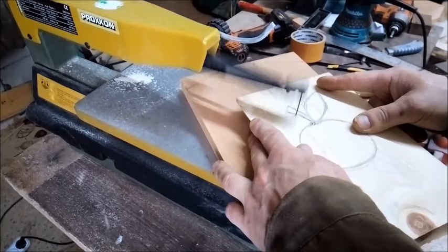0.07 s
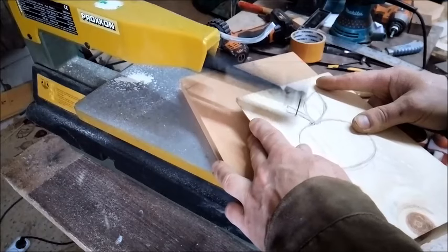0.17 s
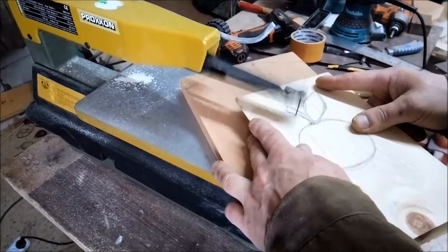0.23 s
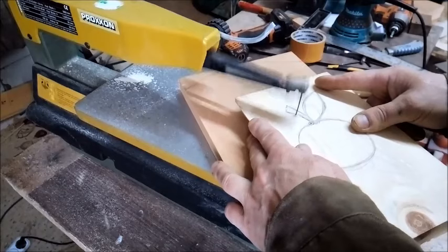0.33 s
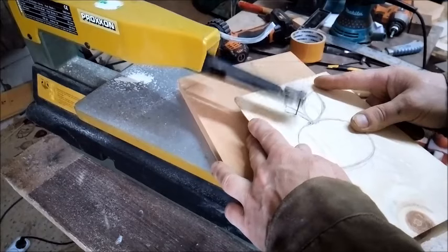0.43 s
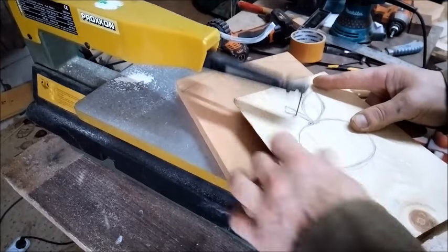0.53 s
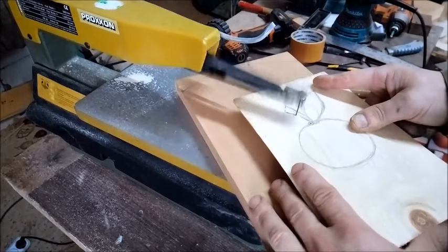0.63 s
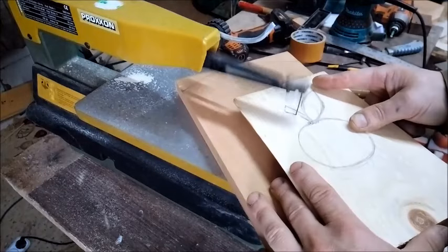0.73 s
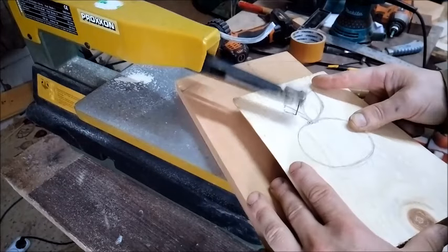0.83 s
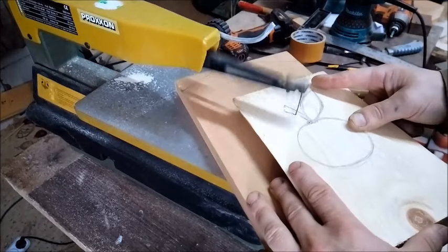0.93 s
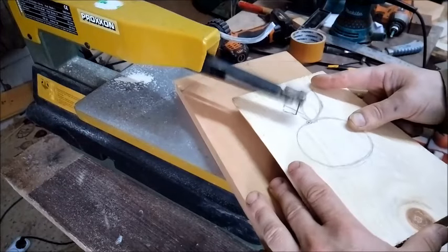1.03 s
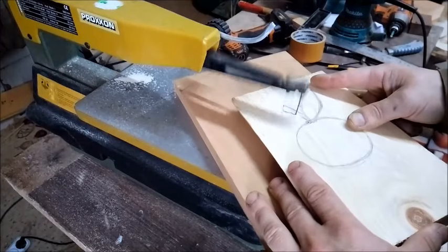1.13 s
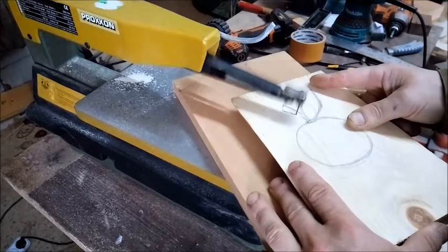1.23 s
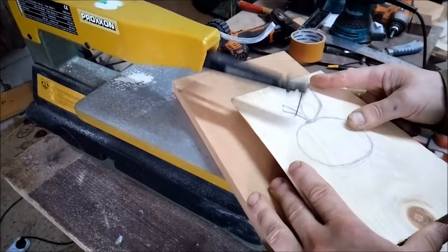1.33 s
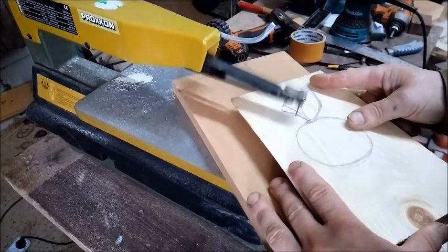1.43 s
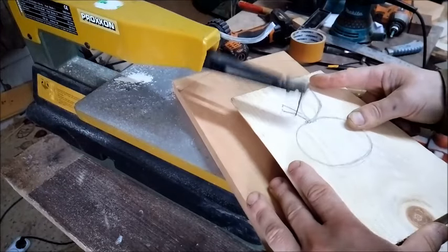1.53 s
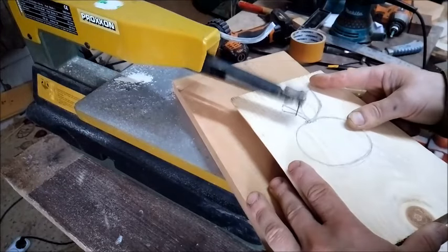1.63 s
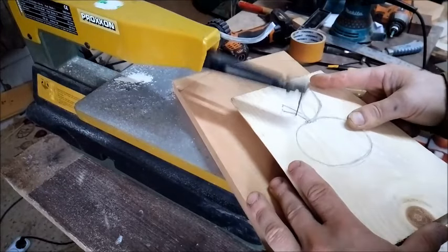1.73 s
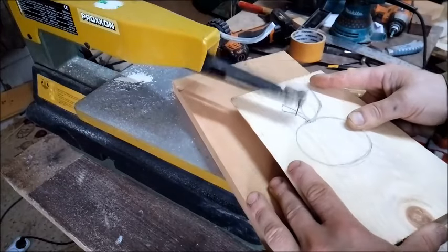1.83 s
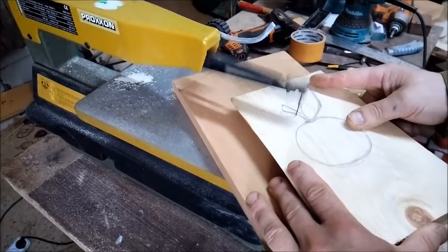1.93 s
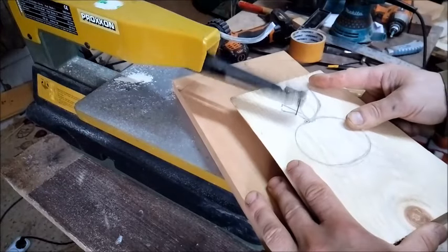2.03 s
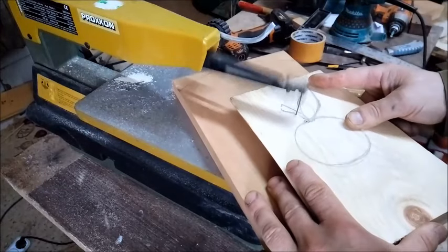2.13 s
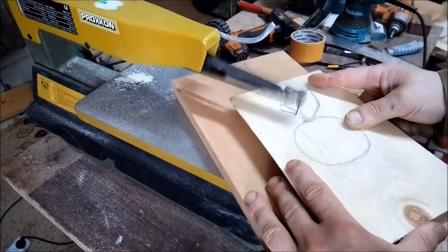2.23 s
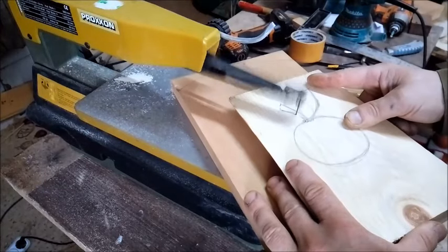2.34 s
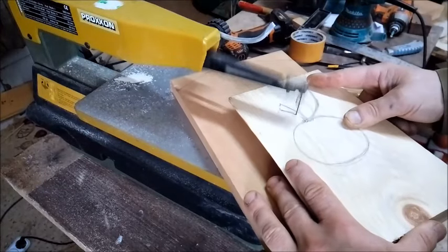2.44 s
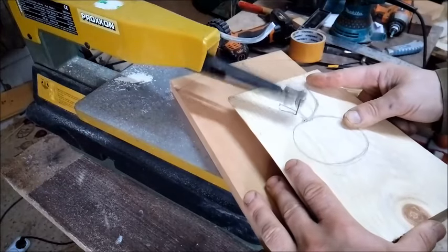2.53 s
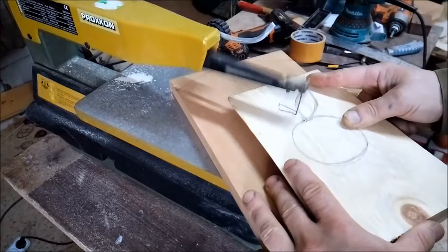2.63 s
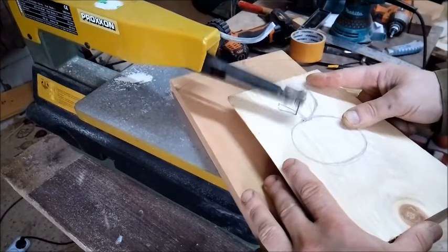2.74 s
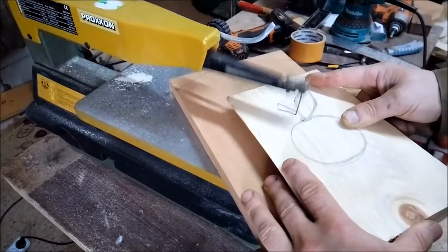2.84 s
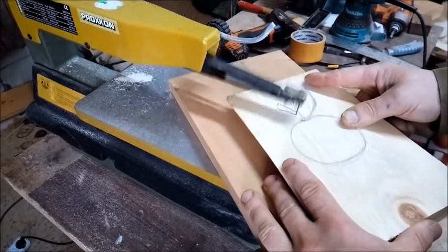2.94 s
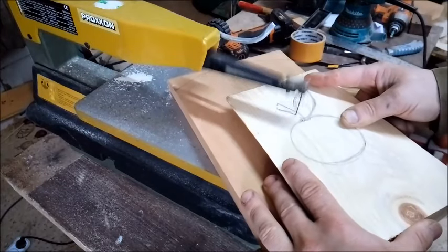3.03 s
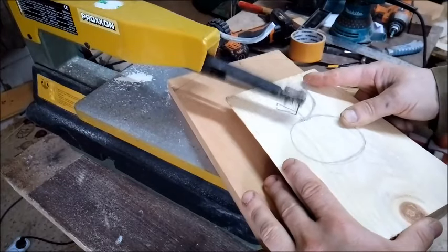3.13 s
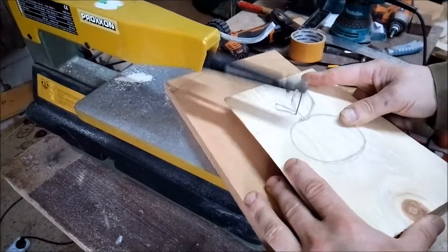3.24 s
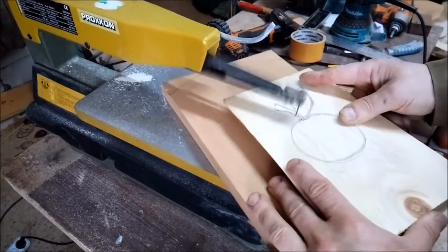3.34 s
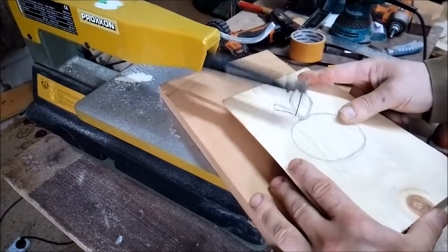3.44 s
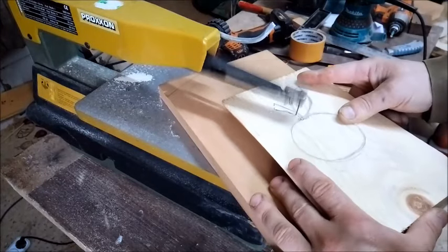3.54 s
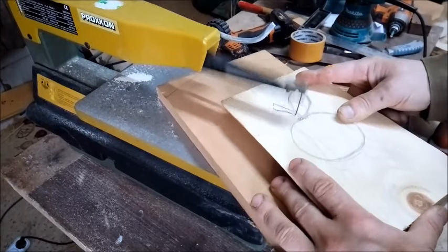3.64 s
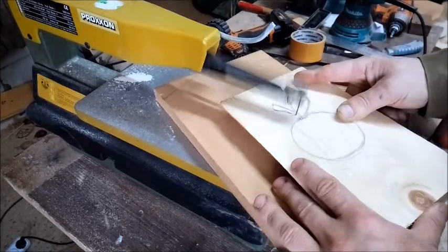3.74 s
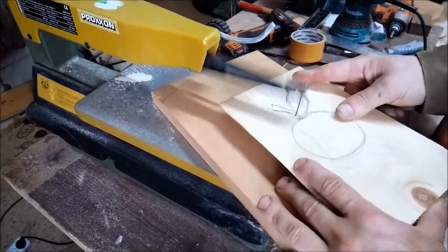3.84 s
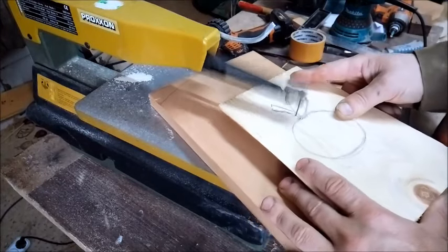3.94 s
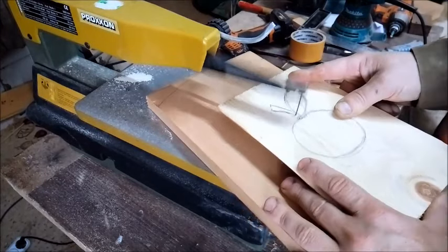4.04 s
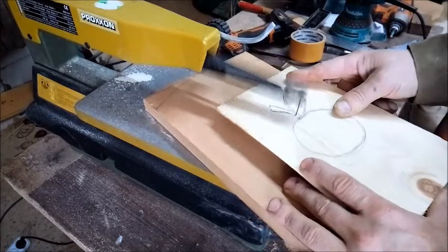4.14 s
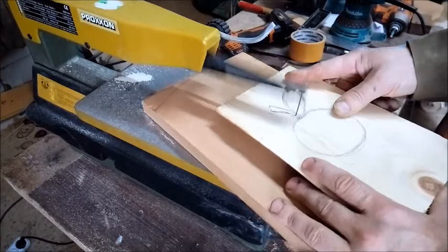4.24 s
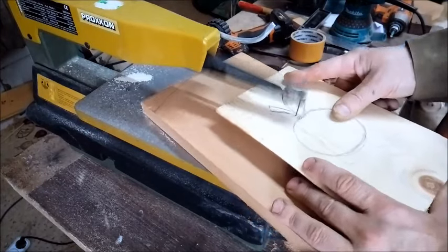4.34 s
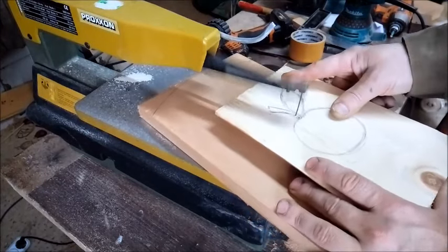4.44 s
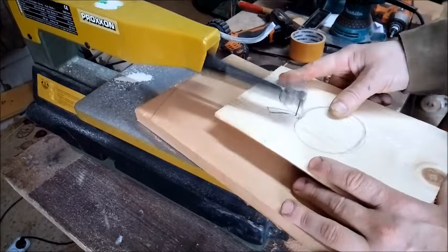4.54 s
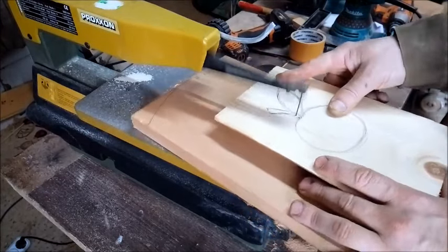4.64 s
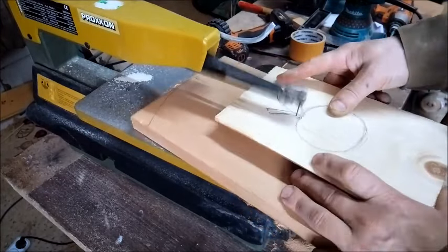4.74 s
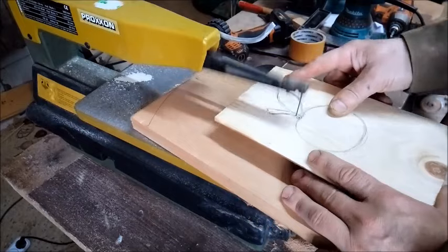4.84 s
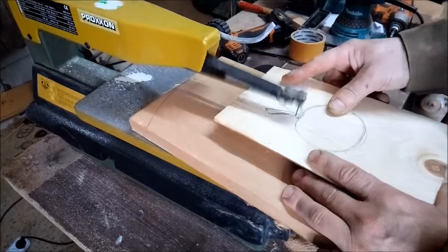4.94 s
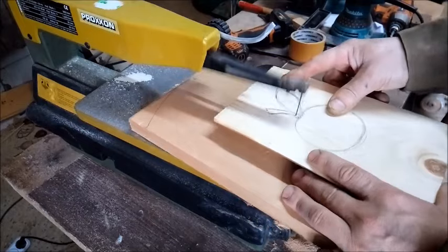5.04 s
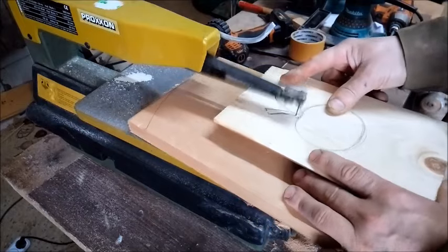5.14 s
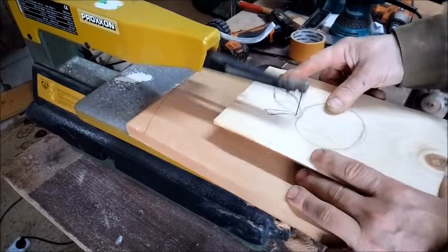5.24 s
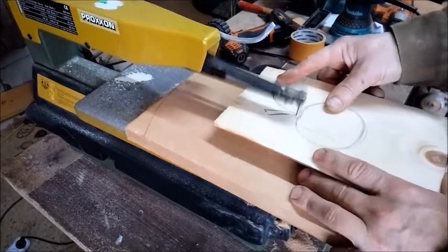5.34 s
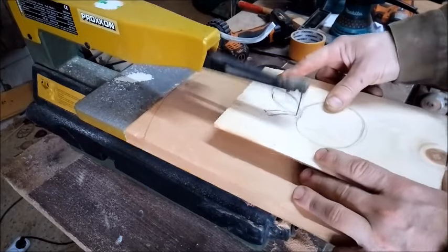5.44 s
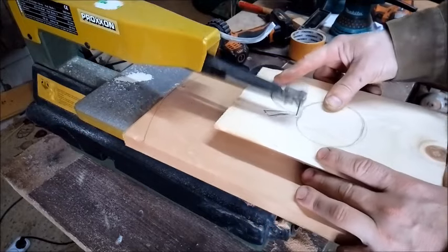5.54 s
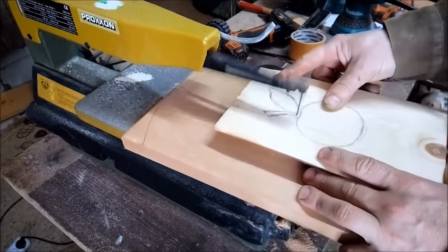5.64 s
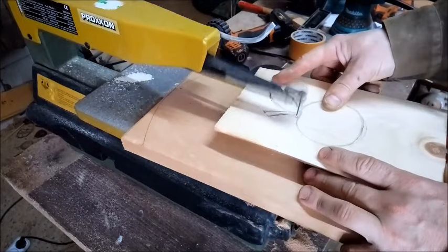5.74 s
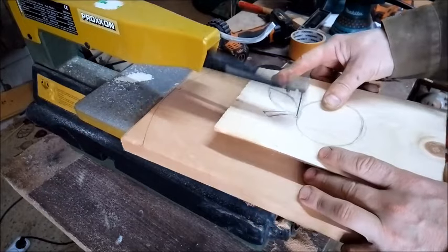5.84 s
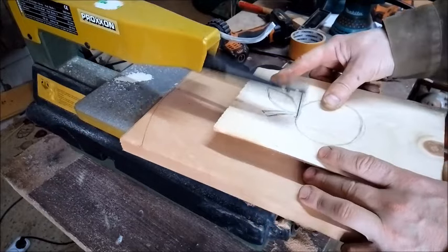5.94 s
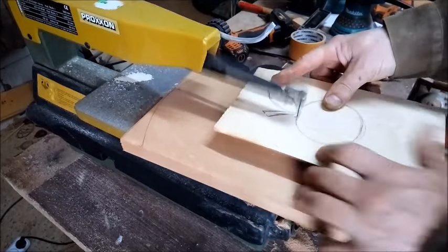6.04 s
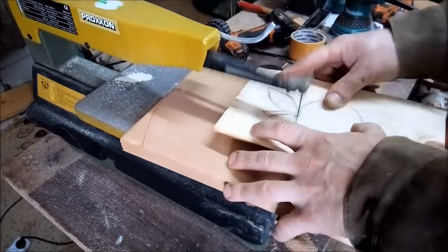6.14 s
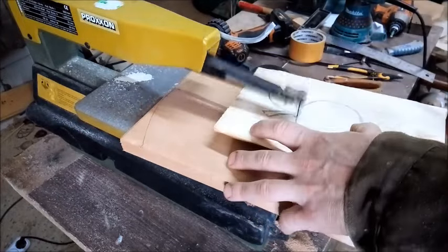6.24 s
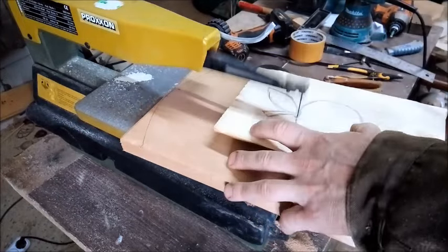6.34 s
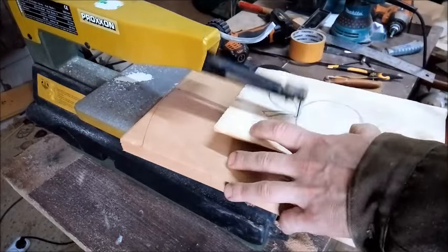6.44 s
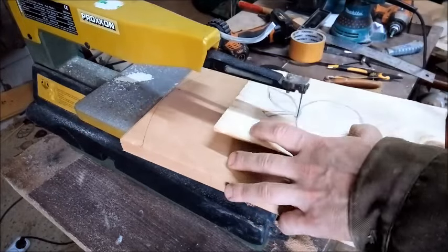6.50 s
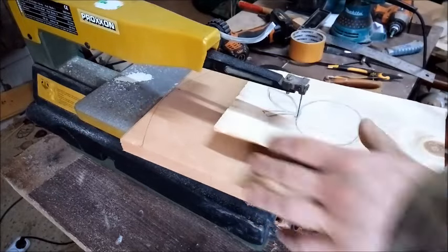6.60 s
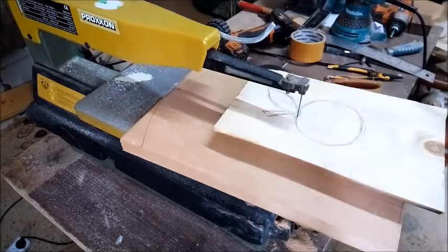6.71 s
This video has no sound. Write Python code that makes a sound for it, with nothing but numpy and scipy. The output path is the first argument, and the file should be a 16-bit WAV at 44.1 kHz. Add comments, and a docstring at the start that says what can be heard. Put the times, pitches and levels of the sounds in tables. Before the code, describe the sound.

A small electric saw cuts wood right beside a stereo microphone. Rapid strokes merge into a rough droning buzz, with metallic linkage clatter, gritty rasp and a wavering high whine from blade and board. After about six seconds the load lightens; the motor cuts out, parts rattle briefly, a thin blade tone fades and the board is set down with light knocks over faint room noise.

```python
"""A scroll saw on a bench, close to a two-port microphone. From the start its teeth rasp a pine board, whose modes
ring with the feed; the crank shakes arm and table at whole multiples of the stroke rate, the linkage clatters,
and the motor hums over a low rumble. At about 6.5 s the saw is switched off and runs down at once, with dull jolts
and loose rattles; the slack blade rings on thinly and a hand sets the board down with wooden taps.
Faint room noise lies under it all."""
import sys
import numpy as np
from scipy import signal
from scipy.fft import rfft, irfft, next_fast_len
from scipy.io import wavfile
from scipy.ndimage import uniform_filter1d, map_coordinates

SR = 44100
rng = np.random.default_rng(int(sys.argv[2]) if len(sys.argv) > 2 else 0)


def int16_out(signal):
    """Quantize to a 16-bit WAV file."""
    q = np.round(np.clip(np.atleast_2d(signal).T, -1, 1) * 32767)
    wavfile.write(sys.argv[1], SR, q.astype(np.int16))


N = 298557
CATCH = .3  # share of the stroke at which the teeth meet the wood
# resonances of the saw body: (centre_hz, width_hz, relative_level_db)
BODY_MODES = [(586.3, 51, 3.5), (736, 44, 3), (918, 29, -4), (1151, 32, 3.5), (1307, 49, 2), (1426, 37, -4),
              (1620, 135, -9.5)]


def amp(db):
    """Decibels to amplitude."""
    return np.exp(np.asarray(db) * np.log(10) / 20)


def unit(x):
    """x at rms 1."""
    return x / np.sqrt(np.mean(x ** 2) + 1e-20)


def along(points, hz):
    """(Hz, value) points read on a log frequency axis."""
    f, v = np.transpose(points)
    return np.interp(np.log(hz + 1), np.log(f + 1), v)


def curves(rows):
    """One value per sample for each column after the time; the end rows hold outwards."""
    s, *cols = np.transpose(rows)
    return [np.interp(np.arange(N) / SR, s, c) for c in cols]


def wobble(rate):
    """A smooth random curve, rate knots a second."""
    coarse = np.arange(0, N + 256, 256)
    knots = rng.standard_normal(int(N * rate / SR) + 4)
    return np.interp(np.arange(N), coarse, map_coordinates(knots, [coarse * rate / SR]))


def filtered(x, response):
    """x times a complex response of frequency."""
    m = next_fast_len(N + 8192)
    return irfft(rfft(x, m) * response(np.fft.rfftfreq(m, 1 / SR)), m)[..., :N]


def coloured(x, spectrum):
    """x through a (Hz, dB) spectrum, at rms 1."""
    return unit(filtered(x, lambda hz: amp(along(spectrum, hz))))


def rung(x, modes):
    """x through causal resonances that leave white noise at its level."""
    def response(f):
        h = 0
        for k, (centre, width, db) in enumerate(modes):
            resonance = 1j * f * width / (centre * centre - f * f + 1j * f * width)
            h = h + (-1) ** k * amp(db) * resonance
        return h / np.sqrt(np.mean(np.abs(h) ** 2))
    return filtered(x, response)


def repeating(strokes, evenness):
    """Two unrelated noises, in part a pattern that returns on every stroke and drifts slowly."""
    memory, size = 0.96, 720  # likeness of one stroke to the next, points in a stroke
    fresh = rng.standard_normal((2, 490, size))
    patterns = signal.lfilter([1], [1, -memory], fresh, axis=1)[:, 40:]  # the first 40 only settle the drift
    kept = np.array([unit(np.interp(strokes * size, np.arange(p.size), p.ravel())) for p in patterns])
    share = np.clip(evenness, 0, 1)
    return np.sqrt(share) * kept + np.sqrt(1 - share) * rng.standard_normal((2, N))


def burst(strokes, start, length):
    """A sudden rise at one point of each stroke, dying over a share of it."""
    since = (strokes - start) % 1
    return np.exp(-since / length) * np.minimum(since * 40, 1)


def blows(strokes, at, jitter):
    """One sharp blow a stroke, rms 1."""
    return unit(np.diff(np.floor(strokes - at + jitter * wobble(40)), prepend=-1) > 0)


def swell(strokes, peak, depth_db):
    """A smooth rise and fall once a stroke."""
    return amp(depth_db * np.cos(2 * np.pi * (strokes - peak)))


def per_stroke(strokes, spread_db):
    """Each stroke is a little louder or softer."""
    return amp(spread_db * rng.standard_normal(500))[strokes.astype(int)]


def driven(evenness):
    """Level in dB of every part that the feed pressure drives, each wavering a little on its own."""
    # how hard the board is pushed into the blade: (time_s, pressure_db)
    feed = [(0.0, 1), (0.6, 2.5), (0.72, -2), (0.92, 1), (1.28, 2.5), (1.52, -0.5), (1.76, 0), (1.84, -1),
            (1.92, -2.5), (2.36, 2), (3.28, 2), (3.6, 4), (3.84, 3.5), (4.08, -1), (4.16, 2.5), (4.4, 0.5),
            (4.48, -1.5), (4.6, 3), (4.72, 0.1), (4.96, -6), (5.12, 0), (5.4, 2.5), (5.8, 3), (5.88, 2),
            (6.2, -8.5), (6.48, -6.5)]
    # the blade bites briefly into harder grain: (centre_s, surge_db, half_length_s)
    surges = [(0.052, 3.5, 0.043), (0.151, 4.5, 0.032), (0.253, 1.5, 0.026), (1.302, 2.5, 0.021),
              (1.71, 3.5, 0.093), (1.946, 3.5, 0.048), (2.964, 4.5, 0.011), (3.624, -0.5, 0.036),
              (4.15, 1.5, 0.047), (4.246, 0.5, 0.02), (4.313, 2.5, 0.012), (4.355, 4.5, 0.043),
              (4.574, 4.5, 0.016), (4.704, 1.5, 0.05), (5.11, 3.5, 0.019), (5.234, 2, 0.04),
              (5.343, 4, 0.032), (5.403, 4.5, 0.049), (5.56, 2, 0.049)]
    # as the board is turned the grain and the overhang change:
    # (time_s, board_db, rasp_db, table_db, blade_db, teeth_ring_db)
    turning = [(0, 1, 1, -2.5, -2, 2), (0.499, 0, -1, 0.5, 2, -3.5), (1.2, -3, -2.5, 2, 0, -3.5),
               (1.7, 1, -2, -2.5, -5, -1.5), (2.3, 0, 0.7, 1.2, -3, 4.5), (3.1, 0, 1.5, 1, 1.5, 4),
               (3.8, 1.8, 0, 1, 4, 3), (4.3, 1.7, 1, -1.5, -3, -0.5), (4.75, 2.5, 3, -1.5, 4.5, 6),
               (5.2, -2.5, 2, 2, -1.5, -4.5), (5.9, -0.6, -1, -1, 1.5, -0.5), (6.1, 0, 6.5, 0, -4, 8),
               (6.25, 3.5, 4.5, 2, -8, 6), (6.48, -3.5, 3, -8, -1, 7)]
    # part: (base_db, db_per_pressure_db, db_per_evenness, wavering_db, share_of_surge, db_once_let_go)
    followers = {"board": (-30, 1.09, 2, -0.14, 1.83, -3), "blade": (-47, 1.1, 13, 2.5, 2.5, -3),
                 "rasp": (-35, 1.45, -3.5, 0.5, 1.13, 3.5), "body": (-32.5, 0.71, -5.5, 0.2, 0.93, -1.5),
                 "clatter": (-41.5, 0.8, 0, -1.1, 0.77, -1),
                 "table": (-32.5, 1.12, 1.94, -0.34, 0.44, -12.5),
                 "teeth": (-39.5, 2.53, -6.5, 1.8, 1.2, 5), "arm": (-43.5, 1, 1.5, 0.7, 0, 5)}
    unsteady_db = 0.31  # the hands never push quite evenly
    let_go_s, let_go_length_s = 6.03, .04  # the guiding hand leaves the board

    t = np.arange(N) / SR
    pressure_db = curves(feed)[0] + unsteady_db * wobble(22.035)
    surge_db = sum(db * np.maximum(1 - np.abs(t - s) / half, 0) for s, db, half in surges)
    free = np.clip((t - let_go_s) / let_go_length_s, 0, 1)
    turned = dict(zip(("board", "rasp", "table", "blade", "teeth"), curves(turning)))
    level = {}
    for part, (db, slope, lean_db, waver_db, share, free_db) in followers.items():
        fed_db = db + slope * pressure_db + share * surge_db
        own_db = turned.get(part, 0) + lean_db * evenness + waver_db * wobble(18)
        level[part] = fed_db + own_db + free_db * free
    return level


def tooth_rasp(strokes, level, evenness, bite):
    """The teeth tear fibres most strongly on the down stroke: broad noise, and a ring of the teeth."""
    # broad colour of the rasp: (frequency_hz, relative_density_db)
    rasp_colour = [(180, -63), (300, -26.5), (519, -5.5), (582, -33), (974, -51), (1310, -12), (2020, -5),
                   (2350, -2), (3060, -5.5), (3860, -7), (15800, -27.5)]
    # ring of the teeth: (centre_hz, width_hz, relative_level_db)
    tooth_modes = [(3810, 120, 4), (3955, 110, 6), (4340, 130, 7), (4663, 90, 5), (6480, 71, -3),
                   (7580, 320, -8)]
    grit = amp(3.66 * rng.standard_normal(N // 40 + 1)).repeat(40)[:N]  # single fibres tear louder
    gate = 0.32 + burst(strokes, 0.17, 0.63) + 0.21 * burst(strokes, 0.68, 0.1)
    teeth = unit(bite * grit * gate * repeating(strokes, 0.4 * evenness))
    broad = amp(level["rasp"] + 2.5) * coloured(teeth, rasp_colour)
    return broad + amp(level["teeth"]) * rung(teeth[::-1], tooth_modes)  # the two noises swapped


def board_ring(strokes, board_db, evenness, bite, high):
    """Slaps and chatter ring the modes of the board, while noise sings at the loaded blade's own tone."""
    # modes of the board: (centre_hz, width_hz)
    board_modes = [(1783, 40), (1860, 40), (2255, 40), (2308, 36), (2385, 55), (2530, 60)]
    # which modes sound depends on where the hands hold the board: (time_s, then relative_db of each mode)
    grip = [(0, -21, -15, -11, -2, 1, -19.5), (.7, -9, -17, -16.5, -2, -0.5, -5),
            (1.4, -19, -12.5, -16, 2, -2, -15), (2, -24, -28, -17, -8.5, -3.5, -12.5),
            (2.3, -10, -19, -30, 1, -3.5, -11), (3.1, -7.5, -21, -16, -1.5, -6.5, -7.5),
            (3.8, -10, -17, -18, -2.5, -3, -9.5), (4.3, -20, -16, -23, -1.5, -4.5, -10),
            (4.7, -16.5, -12.5, -15, 1, -4, -17), (5.2, -18, -16, -14, 1.5, -5, -19.5),
            (5.95, -19, -17, -15, 0.5, -2, -19), (6.15, -29, -10.5, -8, 0, -10, -17),
            (6.5, -23, -14, -6, 1, -17, -18)]
    # the loaded blade's own tone: (centre_hz, width_hz, relative_level_db)
    whine = [(2311, 14, 0)]
    flutter_db = 1.2  # each mode flutters on its own

    slap = evenness * blows(strokes, CATCH + 0.0623, jitter=0.0036)  # lifts, slaps back just after the catch
    chatter = (1.1 - evenness) * repeating(strokes, 0.49)
    push = high * bite * amp(board_db) * (slap + chatter)
    board = 0
    for k, ((hz, width), db) in enumerate(zip(board_modes, curves(grip))):
        mode = rung(amp(db + flutter_db * wobble(14)) * push, [(hz, width, 0)])
        board = board + (-1) ** k * mode
    sing = high * amp(board_db - 4.5) * (1 - evenness) * rng.standard_normal((2, N))
    board = board + rung(sing, whine)
    # the ring waxes and wanes unevenly with the stroke
    return board * swell(strokes, .66 + .04 * wobble(30), depth_db=1.8 + .6 * wobble(25))


def blade_ring(strokes, blade_db, evenness, bite, high):
    """The catch plucks the blade once a stroke, over a rougher noise when the cut is uneven."""
    # resonances of the blade: (centre_hz, width_hz, relative_level_db)
    blade_modes = [(2762, 12, -7.5), (2788, 110, -6.5), (2870, 44, -10.5)]
    pluck = 0.96 * evenness * blows(strokes, CATCH, jitter=0.0035)
    rough = (1.1 - evenness) * repeating(strokes, 0.34)
    return rung(high * bite * amp(blade_db + 2.5) * (pluck + rough), blade_modes)


def body_shudder(strokes, body_db, evenness, bite, low):
    """Noise that swells twice a stroke shudders through the resonances of the saw body."""
    shudder = swell(2 * strokes, 0.7, depth_db=3.5) * repeating(strokes, 0.92 * evenness)
    return rung(low * bite * amp(body_db + 1.5) * shudder, BODY_MODES)


def cutting(strokes, level, evenness, bite, low, high):
    """The teeth catch with a blow, then rasp, feeding blade, board and saw body."""
    out = high ** 1.1 * tooth_rasp(strokes, level, evenness, bite)
    out += board_ring(strokes, level["board"], evenness, bite, high)
    out += blade_ring(strokes, level["blade"], evenness, bite, high)
    return out + body_shudder(strokes, level["body"], evenness, bite, low)


def shaking(strokes, table_db, shake_db):
    """Clean multiples of the stroke rate; the ninth to eleventh meet resonances of table and arm."""
    # (multiple_of_stroke_rate, relative_level_db); levels of 9 to 11 are set below instead
    multiples = [(1, -51), (2, -33), (3, -67), (4, -34.5), (5, -29.5), (6, -23), (7, -13.5), (8, -13),
                 (9, 0), (10, -18.5), (11, -5.5), (12, -16), (13, -16), (14, -18), (15, -30.5), (16, -24.5),
                 (17, -16), (18, -17), (19, -35.5), (20, -25.5), (21, -24), (22, -16.5)]
    # level of the arm resonance: (time_s, level_db)
    arm_resonance = [(0.0, -36), (0.64, -42), (2.24, -35.5), (3.52, -48), (4.24, -29), (4.4, -40),
                     (4.56, -33), (4.72, -36), (5.36, -42.5), (5.76, -52), (6.24, -68), (6.48, -49.5)]
    arm_db, = curves(arm_resonance)
    pull = 0.37 * (table_db + 36.0) + 0.31 * (shake_db + 53.0)  # feed pressure and free shaking drive the others
    strokes = strokes + .006 * wobble(18)  # the crank never turns quite evenly
    out = 0
    for k, db in multiples:
        if k == 9:
            level_db = table_db + 5.0 + 1.5 * wobble(25)
        elif k == 10:
            level_db = table_db - 14 + 2.6 * wobble(3.36)
        elif k == 11:
            level_db = arm_db + .5 + 3.3 * wobble(22.32)
        else:
            level_db = db - 30.0 + pull + 2.0 * wobble(12)
        lead = np.arctan((k - 9) * 3) / (2 * np.pi)  # the push builds up over the stroke and lets go quickly
        out = out + amp(level_db) * np.cos(2 * np.pi * (k * (strokes - .8) + lead))
    return out


def linkage(strokes, clatter_db, arm_db, evenness):
    """The joints strike at the same points of every stroke and ring the steel arm."""
    # slack taken up in the linkage: (share_of_stroke, relative_level_db)
    contacts = [(.17, 4), (.265, 3), (.36, 3.5), (.68, 1)]
    # broad colour of the clatter: (frequency_hz, relative_density_db)
    clatter_colour = [(530, -61), (900, -3), (1160, -13.5), (1530, -27.5), (1920, -7.5), (2130, -8.5),
                      (2290, 4), (2490, -37), (2740, -13.5), (5240, -9), (6830, -11), (11800, -17.5),
                      (13200, -13), (14400, -21), (15800, -19.5)]
    # ring of the steel arm: (centre_hz, width_hz, relative_level_db)
    arm_modes = [(4680, 110, 4), (5200, 300, 0), (5500, 240, 3.5), (6350, 150, 0), (8470, 440, -3),
                 (12200, 300, -2), (14300, 560, 6.5), (15600, 600, -5), (11200, 300, 8)]
    gate = 0.61
    for at, db in contacts:
        strength = amp(db) * per_stroke(strokes - at + 1, spread_db=0.5)
        gate = gate + strength * burst(strokes, at, 0.041)
    rattle = unit(gate * per_stroke(strokes, spread_db=0.5) * repeating(strokes, 0.95 * evenness ** 3))
    clatter = amp(clatter_db + 8.5) * coloured(rattle, clatter_colour)
    struck = per_stroke(strokes, spread_db=1.5) * rattle[::-1]  # the two noises swapped
    return clatter + amp(arm_db) * rung(struck, arm_modes)


def motor(strokes, rumble_db):
    """Magnet hum, beaten by the stroke into side tones, over a low rumble."""
    # hum lines: (hum_hz, multiple_of_stroke_rate_added, relative_level_db)
    hum_lines = [(400, -5, -64), (400, -1, -63), (400, 0, -55), (400, 1, -46), (400, 2, -52), (400, 3, -46),
                 (800, -4, -54), (800, -3, -46), (800, -1, -45), (800, 1, -53), (-800, 21, -51),
                 (-800, 22, -50)]
    # level of all the lines: (time_s, relative_level_db)
    hum_level = [(0, -6.5), (1.4, -2.5), (2.1, -1.5), (2.4, -3.5), (3.9, -1.5), (4.9, -0.5), (6.47, -0.5),
                 (6.52, -16), (6.6, -62), (6.77, -75)]
    # colour of the rumble: (frequency_hz, relative_density_db)
    rumble_colour = [(12, -43), (20, -2.5), (76, 3.5), (222, -14.5), (289, -12.5), (323, 5.5), (357, -9),
                     (400, 0), (520, -27), (880, -120)]
    t = np.arange(N) / SR
    lines = 0
    for hz, multiple, db in hum_lines:
        strength = np.sqrt(2) * amp(db + 3.7 * wobble(10.0))
        lines = lines + strength * np.sin(2 * np.pi * (hz * t + multiple * strokes + rng.random()))
    out = amp(rumble_db + 1.5) * coloured(rng.standard_normal((2, N)), rumble_colour)
    out[0] += amp(curves(hum_level)[0]) * lines
    return out


def overtone(strokes):
    """A thin high tone of the blade, narrow filtered noise, comes and goes and swells with the stroke."""
    # (time_s, relative_level_db)
    tone_level = [(0, -54), (.74, -57), (1.3, -54), (1.44, -48), (2.2, -59), (3.83, -60), (4.24, -60),
                  (4.385, -58), (4.405, -40), (4.43, -42), (4.46, -59), (4.59, -46), (5.0, -54),
                  (5.45, -45), (5.53, -41.5), (5.9, -44.5), (6.1, -51.5), (6.45, -52), (6.6, -80)]
    # (centre_hz, width_hz, relative_level_db)
    tone_modes = [(4642, 18, 0), (4700, 90, -9)]
    level_db = curves(tone_level + [(6.66, -100)])[0] + 4 + 2.9 * wobble(14)
    drive = amp(level_db) * rng.standard_normal((2, N))
    return swell(strokes, 0.94, depth_db=1.0) * rung(drive, tone_modes)


def rattles():
    """Loose parts rattle unevenly as the crank stops; each hit rings those nearest its pitch."""
    # (start_s, relative_level_db, pitch_that_rings_most_hz)
    hits = [(6.488, -38, 1250), (6.497, -38, 2330), (6.503, -37, 1250), (6.513, -40, 1250),
            (6.522, -38, 2330), (6.532, -43, 1250), (6.542, -36, 2900), (6.556, -40, 2330),
            (6.57, -43, 2330), (6.586, -45, 1800), (6.603, -51.5, 2330), (6.614, -53.5, 4700),
            (6.626, -59, 2330)]
    # loose parts: (pitch_hz, t60_s)
    loose_parts = [(1250, .07), (1800, .04), (2330, .07), (2900, 0.062), (4700, .06)]
    out, t = np.zeros(N + SR), np.arange(SR // 8) / SR
    for s, db, near_hz in hits:
        for hz, t60 in loose_parts:
            decay_db = db + rng.normal(0, 2) - 60 * t / t60 - 40 * np.log2(hz / near_hz) ** 2
            tone = np.sin(2 * np.pi * hz * rng.normal(1, .015) * t)
            out[round(s * SR):][:len(t)] += amp(decay_db) * np.minimum(t / 0.0026, 1) * tone
    return out[:N]


def jolts():
    """The switch and the last turns of the crank shake the saw body with single dull blows."""
    # (start_s, blow_db before the filters)
    jolt_times = [(6.494, -14), (6.522, -15), (6.534, -13), (6.582, -12), (6.59, -17), (6.598, -19)]
    blow = np.zeros(N)
    for s, db in jolt_times:
        blow[round(s * SR)] = amp(db)
    return rung(filtered(blow, lambda hz: 1 / (1 + 1j * hz / 650)), BODY_MODES)


def ringing_out():
    """The free blade rings out in one thin tone that outlasts the motor."""
    # start_s, pitch_hz, level_db, t60_s
    s, hz, db, t60 = (6.6, 2760, -64, .3)
    t = np.maximum(np.arange(N) / SR - s, 0)
    return amp(db - 60 * t / t60) * (1 - np.exp(-t / .015)) * np.sin(2 * np.pi * hz * t)


def knocks():
    """The board is set down: taps ring wood modes near each contact's pitch, over a dull scrape and a crack."""
    # (start_s, relative_level_db, contact_pitch_hz, relative_crack_db)
    taps = [(6.7185, -41, 1500, -48.5), (6.7252, -44, 1000, -58), (6.731, -44, 400, -61),
            (6.739, -45.5, 380, -66)]
    # modes of the wood: (pitch_hz, relative_level_db, t60_s), each detuned a little at every tap
    wood_modes = [(365, 2.5, .03), (520, -3, .03), (720, -4, .03), (1000, -2, .03), (1390, -6, .025),
                  (1700, -6, .025), (2050, -6, .025), (2530, -7, .02), (3194, -6, .02)]
    out, scrape, t = np.zeros(N + SR), np.zeros(N + SR), np.arange(SR // 8) / SR
    for s, db, contact_hz, crack_db in taps:
        ring = 0
        for k, (hz, level, t60) in enumerate(wood_modes):
            decay_db = level + rng.normal(0, 2.14) - 60 * t / t60 - 3 * np.log2(hz / contact_hz) ** 2
            tone = np.sin(2 * np.pi * hz * rng.normal(1, 0.059) * t)
            ring = ring + (-1) ** k * amp(decay_db) * tone
        out[round(s * SR):][:len(t)] += amp(db - 8.5) * ring
        crack = amp(crack_db + 8 - 60 * t / .005)
        dull = amp(crack_db - 8 - 60 * t / .11)
        scrape[round(s * SR):][:len(t)] += (crack + dull) * rng.standard_normal(len(t))
    return out[:N] + filtered(scrape[:N], lambda hz: 1 / (1 + 1j * hz / 2500))


def room():
    """Faint steady noise of the place, unrelated at the two ports."""
    # (frequency_hz, relative_density_db)
    room_colour = [(59, -26), (100, -6), (764, -4), (1410, -12), (2720, -10), (3440, -18.5), (4070, -15),
                   (15800, -17)]
    return amp(-68.5) * coloured(rng.standard_normal((2, N)), room_colour)


def ports(pair):
    """Direct and scattered sound mixed at two ports, with level, phase and likeness set by frequency."""
    # level of left over right: (frequency_hz, difference_db)
    left_over_right = [(60, 0), (110, 2), (200, 1.5), (380, 1), (700, 1), (1290, 2.5), (2380, 3), (4400, 1),
                       (8120, -6), (15000, -9.5)]
    # phase lead of the left, negative when it hears later: (frequency_hz, lead_radians)
    left_lead = [(0, -0.5), (1720, -0.04), (2930, -1.45), (4310, -3), (4570, -2), (4910, -3), (5600, -1.5),
                 (6800, -4.5), (7840, -1.5), (8790, -1), (11400, -5.5), (13000, -0.5), (13800, -6.5),
                 (15900, -3.5)]
    # likeness of the ports: (frequency_hz, likeness from 0 to 1)
    alike = [(60, .85), (250, .75), (600, .97), (1300, .9), (1800, .72), (2400, .85), (3400, .4),
             (5000, .58), (9000, .45), (10500, .15), (15000, .28)]

    def response(hz):
        turn = np.arccos(np.clip(along(alike, hz), -1, 1)) / 2
        place = amp(along(left_over_right, hz) / 2) * np.exp(.5j * along(left_lead, hz))
        left = [np.cos(turn) * place, np.sin(turn) * place]
        right = [np.cos(turn) / place, -np.sin(turn) / place]
        return np.array([left, right])
    return filtered(pair, response).sum(axis=1)


def scene():
    """The saw cuts, is switched off and runs down, heard at both ports over the room."""
    # stroke rate under way: (time_s, strokes_per_s)
    speed = [(0.0, 65.107), (0.4, 64.702), (0.8, 65.182), (1.2, 64.486), (1.4, 65.135), (1.6, 65.06),
             (1.8, 65.413), (2.4, 64.834), (2.8, 64.724), (3.3, 64.754), (3.7, 64.823), (4.6, 65.126),
             (4.8, 65.412), (5.4, 65.025), (5.8, 65.427), (6.48, 66.183)]
    # after the switch: (time_s, strokes_per_s, low_parts_db, high_parts_db); the first levels hold until then
    rundown = [(6.488, 69, -4.5, -3), (6.505, 65, -5, -11.5), (6.538, 61, -7, -11), (6.569, 63, -9, -10),
               (6.6, 47, -10, -23), (6.624, 45, -22, -25), (6.645, 36, -49, -60), (6.77, 28, -73, -80)]
    # share of the bite alike on every stroke: (time_s, share)
    evenness_curve = [(0, .45), (.4, .5), (1.4, .55), (2.1, .6), (2.3, .25), (3.9, .25), (4.2, .55),
                      (5.1, .8), (6, .9), (6.77, .9)]
    # slow shaking of the bench fades as the board covers the table, and is back by the switch:
    # (time_s, relative_shake_db, relative_rumble_db)
    bench = [(0, -49, -53), (1.1, -50.5, -52.5), (2, -59.5, -55.5), (3, -56, -51), (4.2, -60.5, -54),
             (4.9, -65, -59), (5.5, -62, -53.5), (6, -61.5, -60), (6.48, -40.5, -59.5)]

    strokes = np.cumsum(curves(list(speed) + [row[:2] for row in rundown])[0]) / SR
    low, high = amp(curves(rundown)[1:])
    shake_db, rumble_db = curves(bench)
    evenness = np.clip(curves(evenness_curve)[0], 0, 1)
    level = driven(evenness)
    bite = per_stroke(strokes + .8, spread_db=1.02)

    saw = cutting(strokes, level, evenness, bite, low, high)
    saw += high * motor(strokes, rumble_db) + overtone(strokes)
    saw += high ** 0.66 * bite ** 0.34 * linkage(strokes, level["clatter"], level["arm"], evenness)
    shake = high * uniform_filter1d(bite, size=200) ** 0.73 * shaking(strokes, level["table"], shake_db)
    direct = shake + jolts() + rattles() + knocks() + ringing_out()
    scattered = 1.14 * wobble(4.004) * shake  # moving hands keep changing the scattered path
    saw += [direct, scattered]
    return ports(saw) + room()


def record(dry):
    """The microphone keeps nothing above its band limit."""
    top_hz = 15780
    return filtered(dry, lambda hz: hz < top_hz)


dry = scene()
out = record(dry)
int16_out(out)
```